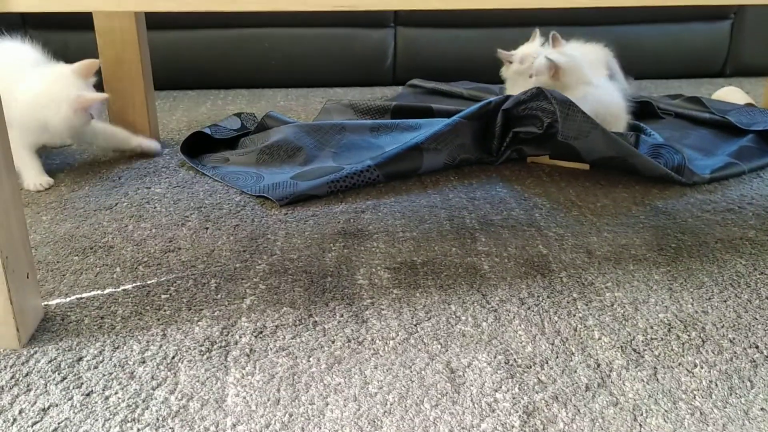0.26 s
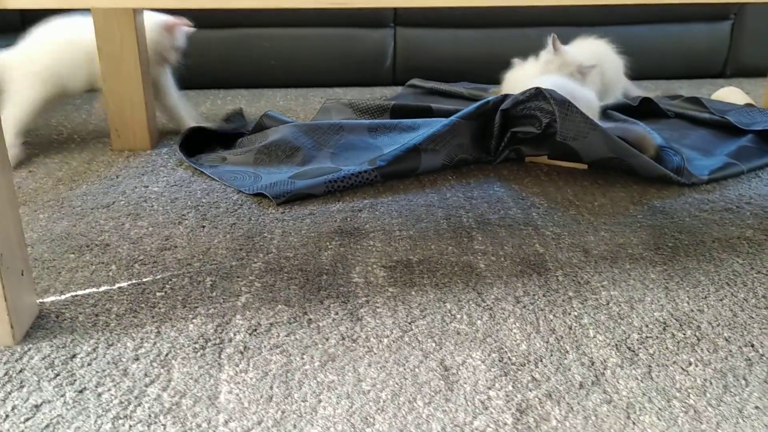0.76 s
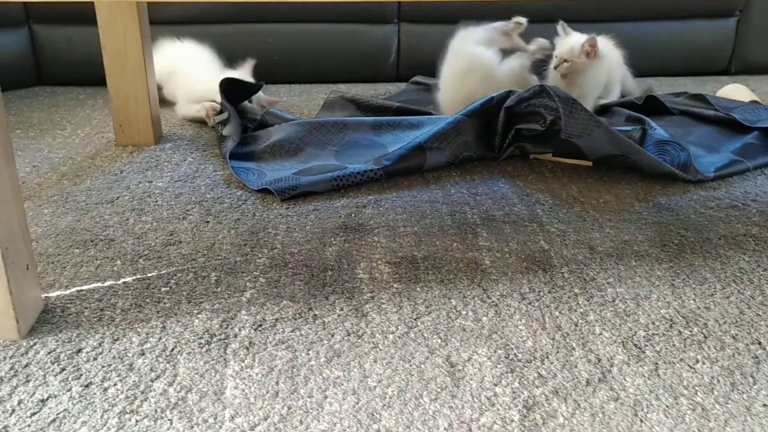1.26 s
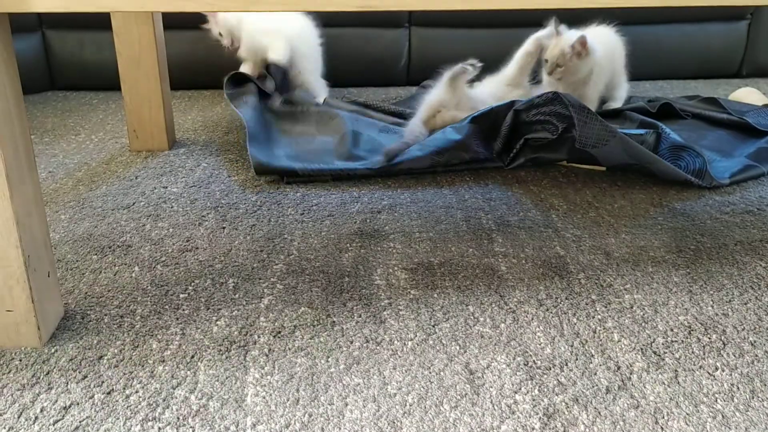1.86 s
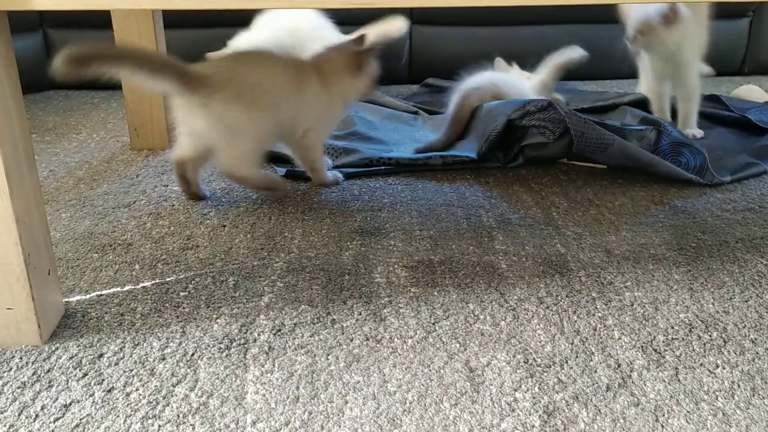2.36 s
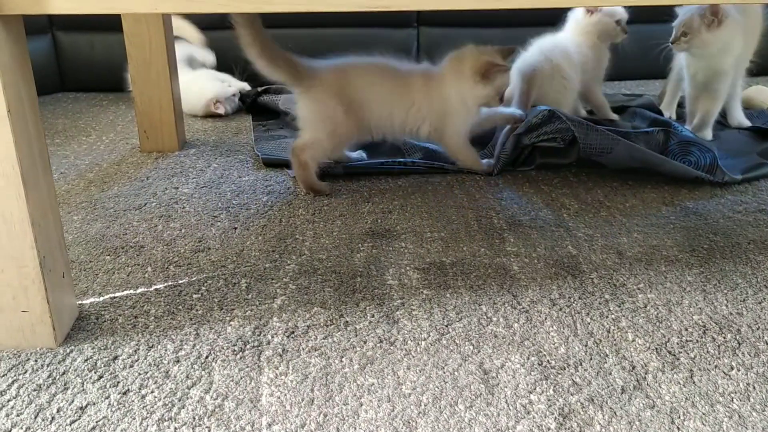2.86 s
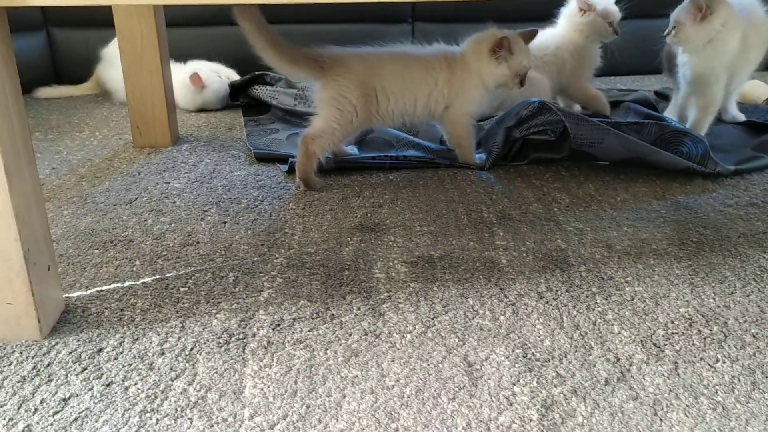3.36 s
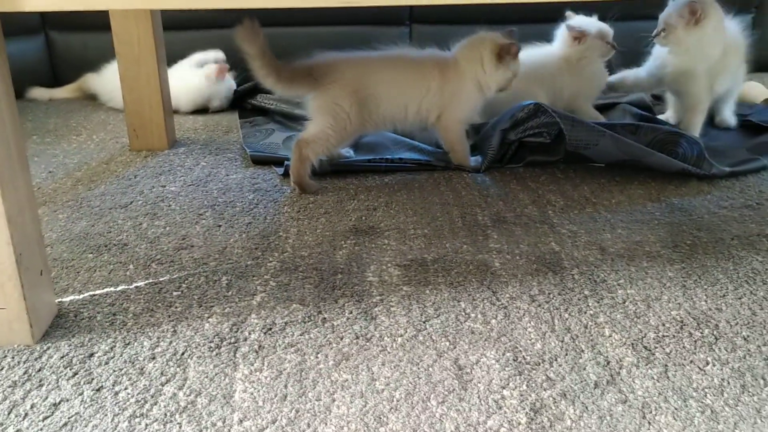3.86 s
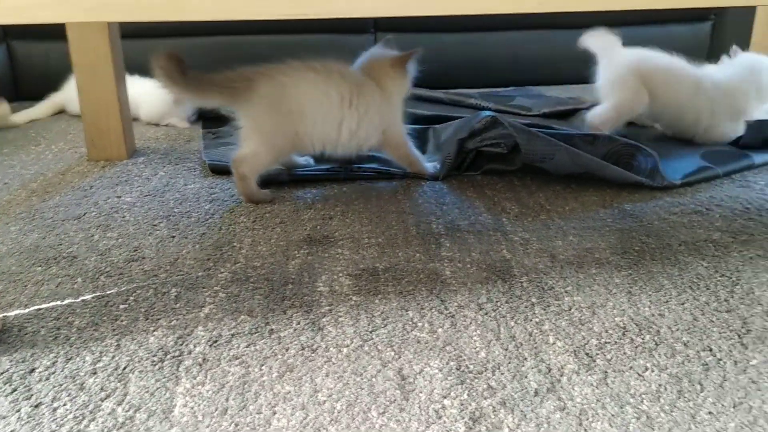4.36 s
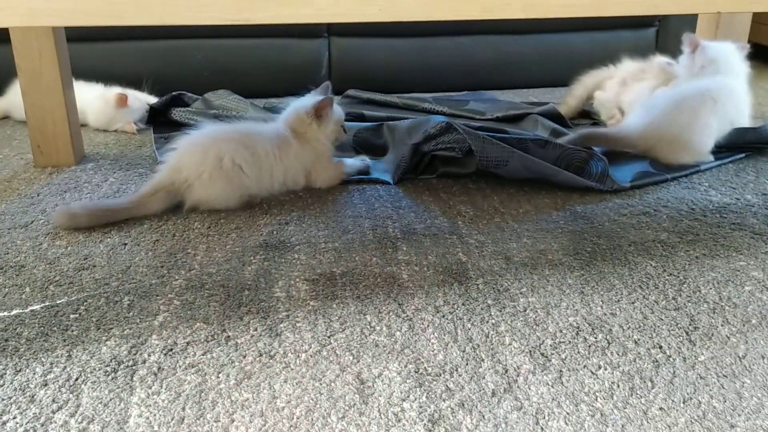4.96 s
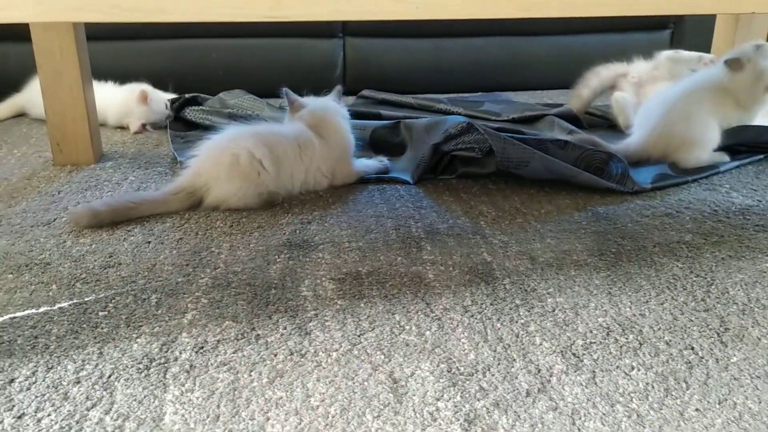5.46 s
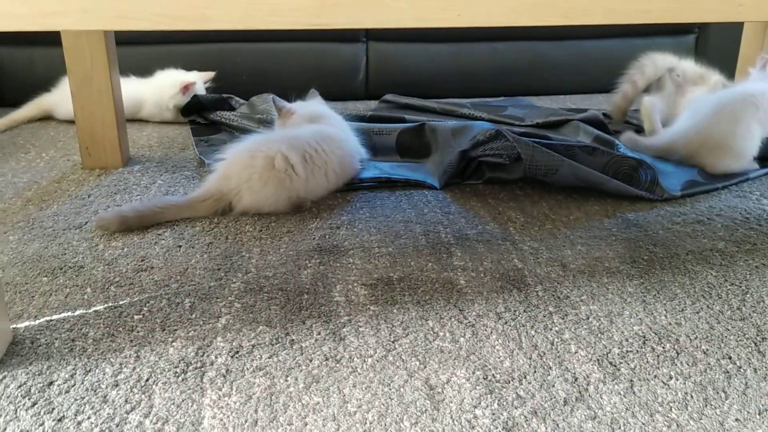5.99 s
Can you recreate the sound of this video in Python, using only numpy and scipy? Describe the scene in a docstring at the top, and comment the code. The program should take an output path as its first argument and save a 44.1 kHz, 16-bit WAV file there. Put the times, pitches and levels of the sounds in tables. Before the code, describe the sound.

In a quiet carpeted room, soft padded thumps and scuffs from scrambling kittens overlap with swishing, crackling stiff cloth. An early knock is followed by busy dragging rustles, low bumps and crisp snaps, then a calmer spell, a sudden heavy burst of thuds, and sparse light rustling. Handheld stereo microphones nearby catch slight room echo, thumps leaning left, with low faint room tone behind.

```python
"""Kittens on a rustling sheet

Kittens scuffle on a carpet in a quiet room, heard through two neighbouring microphone ports.
Paws and bodies thump on the floor and the sofa: decaying sines boom and ring, noise knocks and scuffs.
A crumpled sheet of stiff fabric swishes in swells of shaped noise and ticks in small bursts as it is
dragged, and its folds snap (noise bursts with a wandering tone, some with a rustling tail).
A diffuse echo and a faint hush lie behind."""
import sys
import numpy as np
from scipy import signal
from scipy.fft import rfft, irfft
from scipy.io import wavfile
from scipy.ndimage import uniform_filter1d

SR = 44100
rng = np.random.default_rng(int(sys.argv[2]) if len(sys.argv) > 2 else 0)


def wav_record(signal):
    """Record a signal, one row per channel, as 16-bit PCM in the file named by sys.argv[1]."""
    frames = np.transpose(np.atleast_2d(signal))
    bounded = np.clip(frames, -1, 1)
    # unit amplitude maps onto the largest positive 16-bit level
    quanta = np.round(bounded * 32767).astype(np.int16)
    wavfile.write(sys.argv[1], SR, quanta)


N = 274760  # length in samples

# Spectrum of the quiet room. Each row: frequency [Hz], relative density [dB per Hz].
HUSH_SPECTRUM = [(12, -29), (20, 1), (65, -8), (113, -11), (216, -8), (347, -15), (574, -17), (1090, -27),
                 (1660, -31), (2200, -30), (3250, -34), (6360, -36), (9670, -26), (14300, -47),
                 (16000, -60)]
HUSH_DB = -65.5  # level about which the hush wavers
# Likeness of the two channels of any noise. Each row: frequency [Hz], correlation [0-1].
PORT_LIKENESS = [(30, 0.54), (100, 0.42), (300, 0.89), (700, 0.26), (2000, 0.15), (5000, 0.06)]

# Reverberation time of the room. Each row: frequency [Hz], time to fall by 60 dB [s].
ROOM_DECAY = [(100, 1.83), (230, 0.12), (450, 0.7), (1000, 0.34), (3000, 0.47), (9000, 0.37)]
# Strength of the echo. Each row: frequency [Hz], level against the sound sent to the room [dB].
ROOM_LEVEL = [(80, -4.5), (250, -6.5), (600, -6), (1200, -5.5), (3000, -6), (9000, -5)]

# Balance of the ports: the left hears more bass. Each row: frequency [Hz], left minus right [dB].
PORT_BALANCE = [(40, 9), (120, 6), (260, 7), (600, 4), (2000, 1), (9000, 0), (13000, 3)]
LEFT_LAG_MS = 0.07  # the kittens are a little nearer to the right port
EDGE_HZ = 15800  # upper band limit

# Swells of rustle: drags across the sheet, and the echoing tails of some snaps. Each row: start [s],
# length before release [s], relative swish level [dB], dull rubbing against the swish [dB].
RUSTLE_SWELLS = [(0.0, 0.096, -69.5, -4), (0.15, 0.065, -62, -1.5), (0.238, 0.082, -76, 5),
                 (0.5, 0.1, -69.5, -0.5), (0.646, 0.18, -74.5, 1.5), (0.88, 0.13, -66.5, -5),
                 (0.975, 0.16, -57.5, -8), (1.145, 0.074, -60, -4.5), (1.252, 0.11, -68.5, 1),
                 (1.38, 0.16, -77.5, -8), (1.594, 0.03, -61, 3), (1.603, 0.15, -56.5, -2),
                 (1.77, 0.055, -61.5, -0.5), (1.918, 0.15, -58, 1), (2.135, 0.15, -61, 1.5),
                 (2.31, 0.035, -55, -1.5), (2.343, 0.14, -63, 3), (2.493, 0.077, -56, 4.5),
                 (2.577, 0.047, -66, 11.5), (2.647, 0.2, -59.5, -1), (2.874, 0.083, -62, -1),
                 (3.003, 0.12, -64.5, 1.5), (3.1, 0.034, -63.5, 3.5), (3.241, 0.069, -61, -13),
                 (3.384, 0.025, -60.5, -5), (3.465, 0.042, -67.5, -13), (3.721, 0.051, -68.5, -6),
                 (3.863, 0.045, -65, -20), (3.915, 0.017, -67.5, 18.5), (3.948, 0.078, -68.5, 6.5),
                 (4.063, 0.186, -74, 1), (4.255, 0.065, -63, 0.5), (4.336, 0.17, -60, 4.5),
                 (4.494, 0.029, -53.5, -3.5), (4.585, 0.084, -64, -5.5), (4.74, 0.032, -62.5, -11),
                 (4.817, 0.031, -65.5, -5), (5.012, 0.13, -65.5, -16), (5.294, 0.074, -68, -13),
                 (5.502, 0.16, -63.5, -6), (5.648, 0.022, -56.5, -5), (5.705, 0.058, -64.5, -27),
                 (5.9, 0.13, -72, -25), (6.036, 0.083, -74, -8)]
SWELL_RISE_SHARE, SWELL_RELEASE_S = 0.39, 0.03  # rise as a share of the length; settling time constant
STIR_SWISH_DB, STIR_RUB_DB = -86, -80.5  # relative floor: the sheet never lies quite still
# Spectrum of threads slipping brightly. Each row: frequency [Hz], relative density [dB per Hz].
SWISH_SPECTRUM = [(1000, -56), (2500, -15), (4500, -9), (6500, -6.5), (8300, -2.5), (9800, 2), (11000, -5),
                  (12200, -12.5), (14000, -12.5), (15700, -17.5)]
# Spectrum of dull rubbing. Each row: frequency [Hz], relative density [dB per Hz].
RUB_SPECTRUM = [(150, 2.5), (300, 1.5), (550, 3.5), (900, 2.5), (1600, -4.5), (2600, -3.5), (4000, -9.5),
                (8000, -24)]

# Snaps of a fold. Each row: start [s], relative level [dB], mean pitch [Hz], ring against the crack [dB],
# decay time constant [s], left minus right [dB], level sent to the room [dB].
FOLD_SNAPS = [(0.193, -52.5, 2660, -17.5, 0.0089, 1, -4), (0.493, -59.5, 3020, -27, 0.011, 0, 2),
              (0.6545, -66, 1880, -2, 0.0091, 1, 8.5), (0.8735, -51.5, 1825, -1, 0.013, -0.5, 3),
              (0.892, -54.5, 1810, -6, 0.012, -1, 4), (0.931, -62.5, 1820, 0, 0.01, 0, 3),
              (0.992, -50, 2384, -4.5, 0.023, 0, 1), (1.006, -42.5, 2920, -19, 0.015, -1, 0.5),
              (1.5309, -52, 3230, -21, 0.0044, 3.5, 7), (1.59, -50.5, 3050, -23, 0.015, 0, 4),
              (1.805, -59, 1500, 2.5, 0.0034, -4, -2), (2.2203, -52, 2514, -1.5, 0.006, 0, 6),
              (2.2245, -50, 4350, 2.5, 0.01, 0, -1.5), (3.393, -63.5, 2247, -1, 0.017, 1, 3),
              (3.915, -36.5, 3130, -5, 0.0019, 0, -22), (3.9159, -49, 1430, 1, 0.006, -2, 4),
              (4.3553, -48.5, 2050, -6.5, 0.016, 5, 0), (4.4024, -60, 1710, 3, 0.0044, 3, 4),
              (4.501, -53.5, 2570, 2.5, 0.0022, -1, -10), (4.7534, -55.5, 2370, -19, 0.005, 4, 4),
              (4.82, -53.5, 3050, -29, 0.0054, 3, 3), (5.0145, -52, 2450, 15, 0.0011, -5, -5.5),
              (5.015, -61, 1007, 8.5, 0.0054, -2, 1), (5.6474, -61.5, 2340, 14, 0.002, -8, -4),
              (5.6506, -39.5, 3310, -14, 0.0042, -1, -1.5), (6.036, -60, 2510, -18, 0.018, -2, 0.5)]
SNAP_RISE_SHARE = 0.11  # rise time as a share of the decay time
# Spectrum of a buckling fold. Each row: frequency [Hz], relative density [dB per Hz].
CRACK_SPECTRUM = [(500, -18), (1500, -9.5), (3000, -1.5), (5000, -3.5), (7500, 0.5), (9500, 6),
                  (11000, -1.5), (12500, -17), (14000, -22), (15700, -12.5)]
# Spectrum of the air a fold flaps. Each row: frequency [Hz], relative density [dB per Hz].
FLAP_SPECTRUM = [(120, -35), (300, 11), (500, 8), (1100, 6), (1800, -6), (4000, -9.5)]

# Soft landings. Each row: start [s], relative level [dB], boom pitch [Hz], relative knock [dB],
# relative scuff [dB], relative weight on the floor [dB].
LANDINGS = [(0.194, -56, 373, -1, -1.5, -22), (0.306, -43, 405, -4, -27, -16.5),
            (0.561, -53.5, 275, 0.5, -11, -22), (0.655, -32, 566, -6.5, -15.5, -45),
            (0.665, -30, 359, -8, -27, -45), (0.692, -39, 543, -2, -11, -40),
            (1.003, -49, 169, -12, -30, -13), (1.147, -37.5, 205, -17, -40, -12),
            (1.8, -47.5, 302, -0.5, -6, -34), (1.921, -42, 314, -0.5, -7.5, -20),
            (2.122, -32.5, 218, -9, -38, -18), (2.14, -33, 158.4, -16, -32, -10),
            (2.173, -44.5, 144, -12, -29, -7), (2.219, -39.5, 502, -5, -14, -14),
            (2.362, -48, 458, -2, -15, -25), (2.536, -41.5, 188, -12, -8, -10),
            (2.603, -45.5, 525, -2, -9.5, -18), (2.672, -46.5, 404, -6, -10, -17),
            (3.055, -41.5, 191, -8.5, -15, -14), (3.093, -40.5, 204, -5, -5, -17),
            (3.121, -40, 199, -3.5, -21, -17), (3.149, -37, 192.6, -11, -17, -18),
            (3.39, -51.5, 200, 0, -3, -20), (3.606, -59.5, 215, 1, -9, -23),
            (3.737, -48.5, 533, -4, -14, -36), (3.915, -42.5, 520, -0.5, -11, -47),
            (4.358, -33.5, 399, -4.5, -10.5, -43), (4.38, -41, 517, -12, -21, -24),
            (4.4025, -29.5, 549, -7.5, -7.5, -41), (4.408, -19, 242, -15, -20, -57),
            (4.445, -25, 218, -13, -18.5, -46), (4.487, -39.5, 218, -19, -7.5, -45),
            (4.756, -54, 178, 2.5, -2, -27), (4.856, -43.5, 259, 0.5, -26, -34),
            (4.873, -43.5, 198, -7, -37, -24), (5.569, -49, 204, 1.5, -14.5, -14),
            (5.651, -52.5, 552, -1, -14, -29), (5.977, -47, 247, -9, -35, -35),
            (6.009, -51, 240, -2, -34, -24), (6.042, -51, 234, -1, -9, -27)]
# Modes of the furniture. Each row: frequency [Hz], relative level [dB],
# time to fall by 60 dB [s] before the shared envelope shortens it.
FURNITURE_MODES = [(166.4, 1.5, 0.27), (198.8, -9, 0.75), (233.9, -5, 0.36), (240, 1, 0.096),
                   (340.9, -1, 0.23), (401, 2.5, 0.13), (495, 4, 0.04), (577.4, -0.5, 0.14),
                   (815, -16, 0.075), (980, -23.5, 0.11)]
# Spectrum of a paw striking the carpet. Each row: frequency [Hz], relative density [dB per Hz].
KNOCK_SPECTRUM = [(50, -27), (120, -14), (220, 6.5), (350, 7.5), (480, 11), (610, 1), (740, -37),
                  (1200, -41), (3000, -82)]
# Spectrum of a paw brushing the pile. Each row: frequency [Hz], relative density [dB per Hz].
SCUFF_SPECTRUM = [(300, -6.5), (600, 0), (850, 12.5), (1150, 2), (1600, -12.5), (3000, -17), (8000, -65)]
BOOM_CYCLES = 2.44  # decay time constant of a boom, in its own cycles
CONTACT_S, TYPICAL_DB = 0.016, -42.5  # decay time constant and table level of a typical thump
DOUBLING_DB = 35  # contact time doubles for a blow this much harder
SCUFF_SHARE = 0.83  # decay of the scuff as a share of the contact time
THUMP_PAN_DB = -2.5  # left minus right


def amp(db):
    """Decibel law: the amplitude ratio of a level in dB."""
    return 10 ** (np.asarray(db) / 20)


def unit(x):
    """Normalisation of power: scales to rms 1."""
    return x / np.sqrt(np.mean(x ** 2) + 1e-20)


def read(points, hz):
    """Logarithmic frequency scale: joins (Hz, value) points along it."""
    f, value = np.transpose(points)
    return np.interp(np.log(hz + 1), np.log(f + 1), value)


def add(mix, s, sound, pan_db=0):
    """Superposition with a level difference: mixes a sound in at s seconds; positive pan leans left."""
    start = max(round(s * SR), 0)
    part = mix[:, start:][:, :sound.shape[-1]]
    panned = sound * amp([[pan_db / 2], [-pan_db / 2]])
    part += panned[:, :part.shape[1]]


def colour(x, spectrum):
    """Partial coherence: a shared and an opposed part give two channels their likeness; rms 1."""
    hz = np.fft.rfftfreq(x.shape[1], 1 / SR)
    z = rfft(x)
    same = np.clip(read(PORT_LIKENESS, hz), 0, 1)
    mid = z[0] * np.sqrt(1 + same)
    side = z[1] * np.sqrt(1 - same)
    stereo = np.array([mid + side, mid - side])
    return unit(irfft(stereo * amp(read(spectrum, hz)), x.shape[1]))


def noise(spectrum, size):
    """Spectral shaping: Gaussian noise becomes coloured stereo noise."""
    return colour(rng.standard_normal((2, size)), spectrum)


def steady(x, size):
    """Power levelling: removes chance swells of a short noise, so that a blow keeps its strength."""
    power = uniform_filter1d((x ** 2).mean(0), size, mode="wrap")
    return x / np.sqrt(power + 1e-9)


def blow(t, rise, decay):
    """Impulsive excitation: an envelope climbs to 1 and dies away exponentially."""
    shape = (1 - np.exp(-(t / max(rise, 1e-4)) ** 2)) * np.exp(-t / max(decay, 5e-4))
    return shape / shape.max()


def drift(size):
    """Low-pass fluctuation: slow chance of rms 1, averaged twice over size samples."""
    once = uniform_filter1d(rng.standard_normal(N), size)
    return unit(uniform_filter1d(once, size))


def hush(waver_db=2.63):
    """Background noise: the low rumble of the house and faint hiss, with a slowly wavering level."""
    return amp(HUSH_DB + waver_db * drift(size=5000)) * noise(HUSH_SPECTRUM, N)


def room(x, build=0.0055):
    """Diffuse reverberation: a noise tail builds over some milliseconds, each band dying at its own speed."""
    hz, t, z = signal.stft(noise([(20, 0), (20000, 0)], size=SR), SR, nperseg=512)
    t60 = np.maximum(read(ROOM_DECAY, hz), 0.05)[:, None]
    decay = amp(-60 * t / t60)
    decay_norm = np.linalg.norm(decay, axis=1, keepdims=True)  # level independent of decay time
    z = z * decay / decay_norm * amp(read(ROOM_LEVEL, hz))[:, None]
    tail = signal.istft(z, SR, nperseg=512)[1] / np.sqrt(256)
    tail *= 1 - np.exp(-(np.arange(tail.shape[1]) / SR / build) ** 2)
    return signal.fftconvolve(x, tail, axes=1)[:, :N]


def swelling():
    """Addition of powers: swells rise, hold and settle over a faint stir; returns swish and rub strengths."""
    t = np.arange(N) / SR
    swish_power, rub_power = amp(STIR_SWISH_DB) ** 2, amp(STIR_RUB_DB) ** 2
    for start, length, db, dull in RUSTLE_SWELLS:
        rise = np.clip((t - start) / (SWELL_RISE_SHARE * length), 0, 1)
        release = np.exp(-np.clip(t - start - length, 0, 1) / SWELL_RELEASE_S)
        power = (amp(db) * rise * release) ** 2
        swish_power = swish_power + power
        rub_power = rub_power + power * amp(dull) ** 2
    return np.sqrt(swish_power), np.sqrt(rub_power)


def sheet(swish, rub, swish_db=-1, rub_db=-3, flutter_db=1.16):
    """Sliding friction: threads slip in a bright swish and a dull rub, under a pressure that wavers."""
    bright = swish * amp(swish_db) * noise(SWISH_SPECTRUM, N)
    dull = rub * amp(rub_db) * noise(RUB_SPECTRUM, N)
    return (bright + dull) * amp(flutter_db * drift(size=700))


def shifting(x, patchy_db=2.5):
    """Time-varying filtering: the rustle's colour shifts at random in small patches of time and frequency."""
    z = signal.stft(x, SR, nperseg=512)[2]
    patches = uniform_filter1d(rng.standard_normal(z.shape[1:]), size=9, axis=0)  # along frequency
    patches = unit(uniform_filter1d(patches, size=7, axis=1))  # along time
    gain = unit(amp(patchy_db * patches))
    return signal.istft(z * gain, SR, nperseg=512)[1][:, :N]


def fold(t, hz, wander, cycles=1.72):
    """Tension sets pitch: a taut patch starts at its own pitch, which wanders as the tension shifts."""
    span = round(cycles * SR / hz) + 1
    slack = unit(uniform_filter1d(rng.standard_normal((2, len(t))), size=span))
    slack *= 1 - np.exp(-(t / 0.003) ** 2)  # wander sets in over about 3 ms
    phase = 2 * np.pi * np.cumsum(hz * (1 + wander * slack), axis=1) / SR
    return np.sqrt(2) * np.sin(phase)


def crinkles(motion, count=700, level_db=-4, spread_db=3, low_hz=900, high_hz=8000):
    """Random impulses: small creases tick at chance moments, as hard as the sheet is rustling."""
    out = np.zeros((2, N))
    t = np.arange(512) / SR
    shape = blow(t, rise=0.0003, decay=0.001)
    for when, pitch, size, side in rng.random((count, 4)):
        extra_db = spread_db * min(-np.log(1 - size), 2)  # many weak ticks, few strong
        strength = motion[int(when * N)] * amp(level_db + extra_db)
        hz = low_hz * (high_hz / low_hz) ** pitch
        tick = fold(t, hz, wander=0.31) + noise(CRACK_SPECTRUM, len(t))
        add(out, when * N / SR, strength * tick * shape, 6 * (side - 0.5))
    return out


def snaps(flap_db=-6):
    """Buckling: a fold cracks, its taut patch rings briefly and air flaps; returns direct and room sends."""
    out, sent = np.zeros((2, N)), np.zeros((2, N))
    t = np.arange(8192) / SR
    for s, db, hz, ring_db, decay, pan, echo_db in FOLD_SNAPS:
        crack = steady(noise(CRACK_SPECTRUM, len(t)), size=60)
        ring = amp(ring_db) * fold(t, hz, wander=0.203)
        flap = amp(flap_db) * steady(noise(FLAP_SPECTRUM, len(t)), size=120)
        sound = (crack + ring + flap) * amp(db) * blow(t, SNAP_RISE_SHARE * decay, decay)
        add(out, s, sound, pan)
        add(sent, s, amp(echo_db) * sound)  # near folds sound drier
    return out, sent


def furniture(t, ring_db=-10):
    """Modal superposition: a padded blow sets the modes of the wood ringing gradually."""
    ring = np.zeros(len(t))
    for k, (hz, db, t60) in enumerate(FURNITURE_MODES):
        polarity = (-1) ** k
        ring += polarity * amp(db - 60 * t / t60) * np.sin(2 * np.pi * hz * t)
    ring *= blow(t, rise=0.0029, decay=0.24)
    return amp(ring_db) * ring / abs(ring).max()


def paw(t, db, knock_db, scuff_db, contact_rise=0.001):
    """Contact noise: a paw knocks the carpet and scuffs its pile, for longer under a harder blow."""
    contact = CONTACT_S * 2 ** ((db - TYPICAL_DB) / DOUBLING_DB)
    knock = steady(noise(KNOCK_SPECTRUM, len(t)), size=300) * blow(t, contact_rise, contact)
    scuff = steady(noise(SCUFF_SPECTRUM, len(t)), size=150)
    scuff = scuff * blow(t, contact_rise, SCUFF_SHARE * contact)
    return amp(knock_db) * knock + amp(scuff_db) * scuff


def thumps(boom_db=-4, knock_db=-4, scuff_db=-2, floor_db=-2, floor_hz=72, floor_decay=0.018):
    """Damped oscillation: a soft landing booms at one pitch, flexes the floor and rings the furniture."""
    out = np.zeros((2, N))
    t = np.arange(22050) / SR
    body = furniture(t)
    flex = amp(floor_db) * blow(t, rise=0.01, decay=floor_decay) * np.sin(2 * np.pi * floor_hz * t)
    for s, db, hz, knock, scuff, weight in LANDINGS:
        boom_shape = blow(t, rise=0.0057, decay=BOOM_CYCLES / hz)
        boom = amp(boom_db) * boom_shape * np.sin(2 * np.pi * hz * t)
        contact = paw(t, db, knock_db + knock, scuff_db + scuff)
        add(out, s, amp(db) * (boom + body + amp(weight) * flex + contact), THUMP_PAN_DB)
    return out


def scene():
    """Superposition of direct and reverberant fields: the kittens and their sheet in the room."""
    background = hush()
    swish, rub = swelling()
    rustle = shifting(sheet(swish, rub)) + crinkles(np.sqrt(swish * rub))
    cracks, cracks_sent = snaps()
    scuffle = rustle + thumps()
    return scuffle + cracks + room(scuffle + cracks_sent) + background


def record(dry):
    """Level and time differences: the two ports differ in balance and delay; a low-pass limits the band."""
    hz = np.fft.rfftfreq(N, 1 / SR)
    lean = amp(read(PORT_BALANCE, hz) / 2)
    lag = np.exp(-2j * np.pi * hz * LEFT_LAG_MS / 1000)
    heard = irfft(rfft(dry) * np.array([lean * lag, 1 / lean]), N)
    band_limit = signal.firwin(511, EDGE_HZ, window=("kaiser", 9), fs=SR)
    return signal.oaconvolve(heard, band_limit[None], "same")


dry = scene()
out = record(dry)
wav_record(out)
```